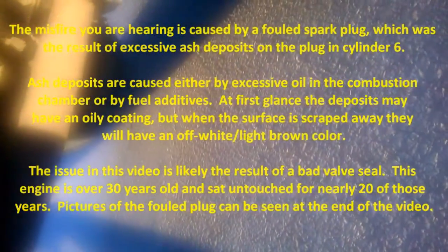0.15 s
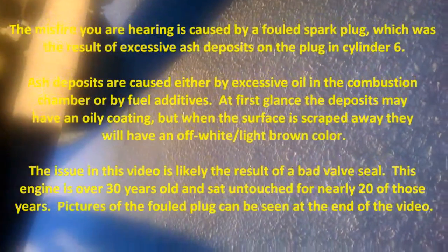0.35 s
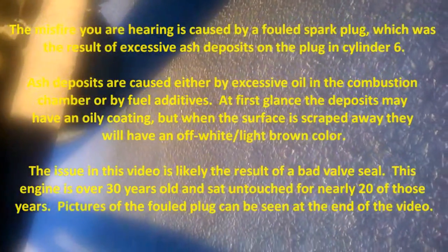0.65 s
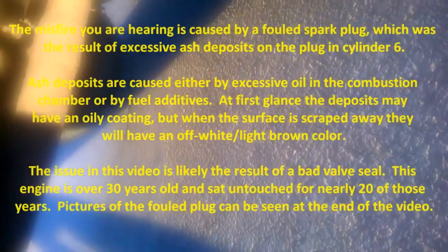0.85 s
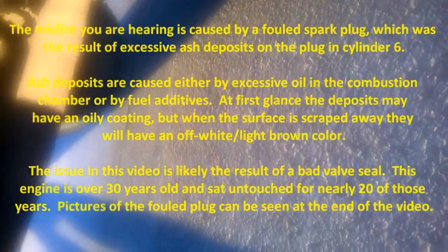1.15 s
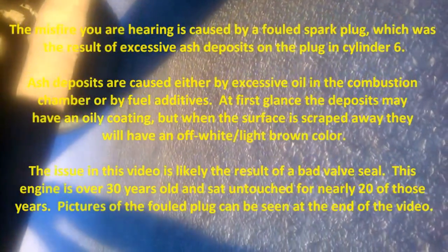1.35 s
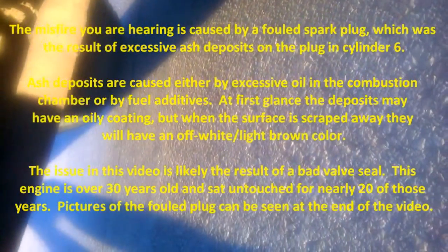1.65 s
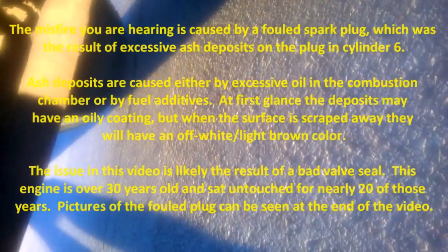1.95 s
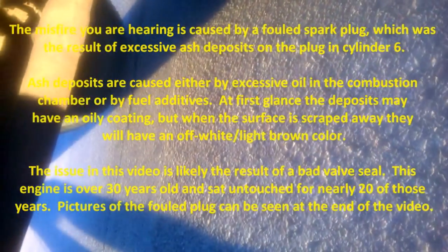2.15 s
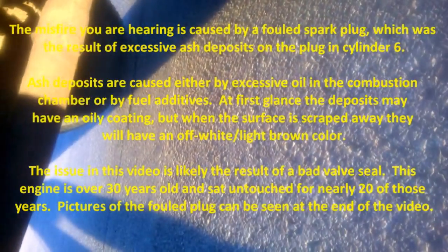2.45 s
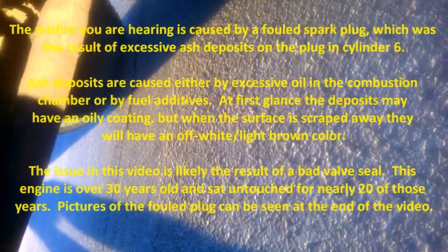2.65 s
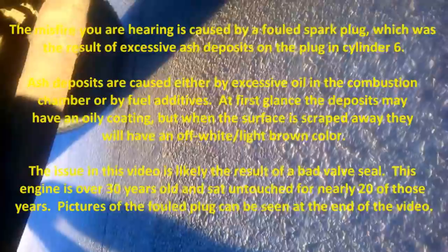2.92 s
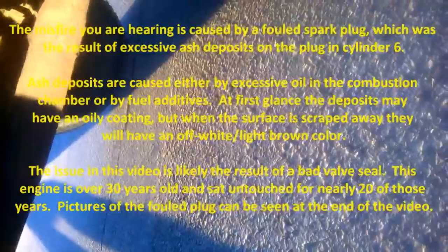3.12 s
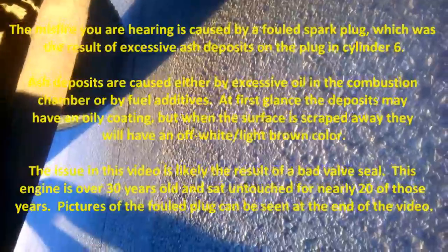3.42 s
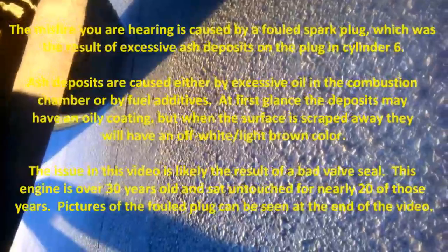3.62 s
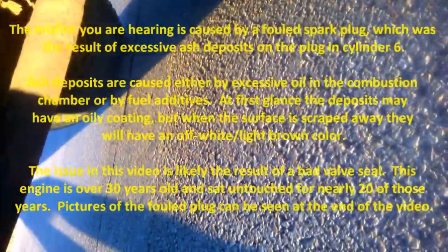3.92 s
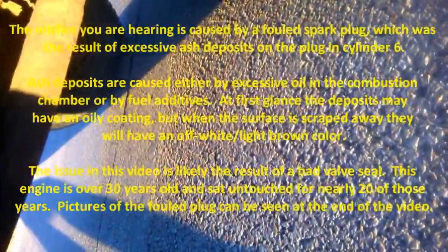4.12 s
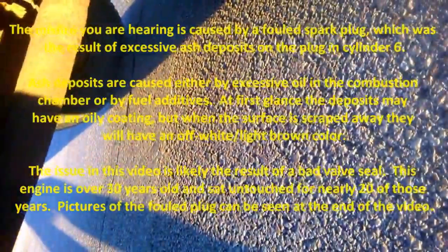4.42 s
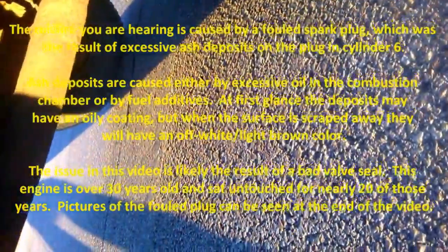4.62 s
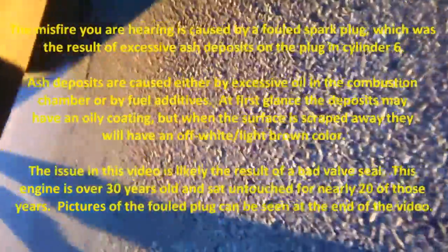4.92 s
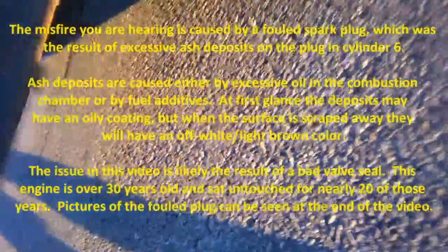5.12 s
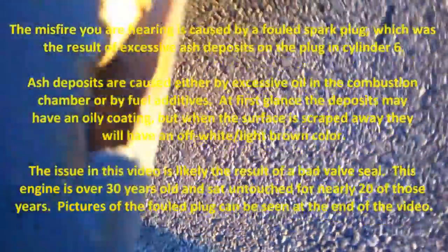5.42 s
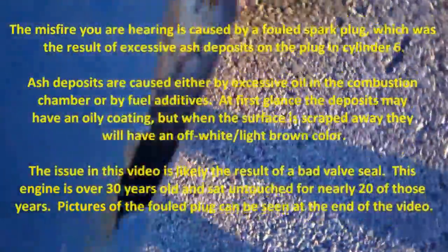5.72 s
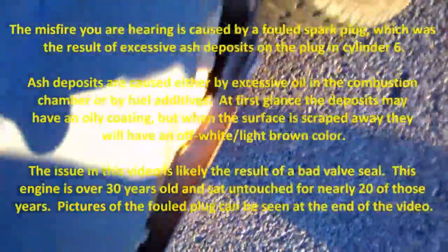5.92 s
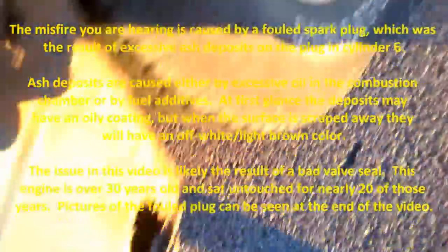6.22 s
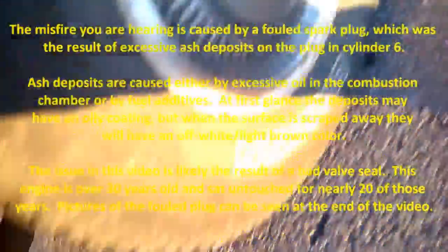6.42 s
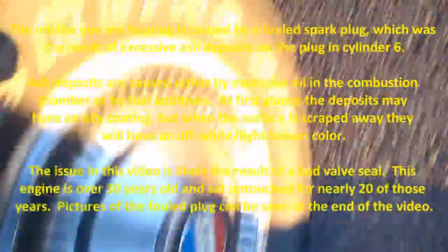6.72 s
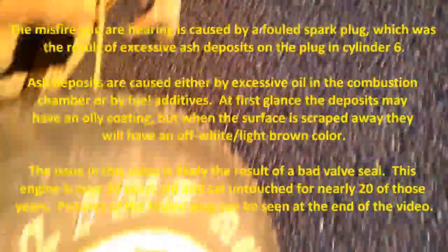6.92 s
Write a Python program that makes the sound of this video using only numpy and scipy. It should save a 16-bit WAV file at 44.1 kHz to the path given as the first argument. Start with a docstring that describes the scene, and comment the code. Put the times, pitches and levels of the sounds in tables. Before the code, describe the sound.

A steady low engine drone dominates, recorded near the exhaust, with uneven flutter and faint clatter and fan rush behind. A misfire pops just after two seconds, with a small click as the sound skips, then again around three and five seconds; the idle dips and recovers each time. Finally the exhaust thins out and the ticking, rushing engine bay is left exposed.

```python
"""Idling six-cylinder engine near its tailpipe

The exhaust hums on harmonics of the four-stroke cycle, while random firing strengths ring the pipe modes.
The engine bay adds shaped-noise roar, valve ticks as short damped tones, belt whine and a block drone.
Three misfired charges pop in the exhaust as a pipe ring and bursts of noise, and the idle sags.
Late on the microphone moves from the pipe towards the bay; once the sound skips ahead with a click."""
import sys
import numpy as np
from scipy import signal
from scipy.fft import rfft, irfft
from scipy.io import wavfile

SR = 44100
rng = np.random.default_rng(int(sys.argv[2]) if len(sys.argv) > 2 else 0)


def generate_wav(signal):
    """Clip the signal to [-1, 1] and save it as 16-bit WAV at the path in sys.argv[1]."""
    frames = np.transpose(np.atleast_2d(signal))
    scaled = np.clip(frames, -1, 1) * 32767
    pcm = np.round(scaled).astype(np.int16)
    wavfile.write(sys.argv[1], SR, pcm)


N = 311346


def gain_of(db):
    """Logarithmic level: decibels to amplitude ratio."""
    return 10 ** (np.asarray(db) / 20)


def evened(x):
    """Power normalisation: scales to rms 1."""
    return x / np.sqrt(np.mean(x ** 2) + 1e-20)


def read(points, hz):
    """Spectral envelope: interpolates levels along a log-frequency axis."""
    f, value = np.transpose(points)
    return np.interp(np.log(hz + 1), np.log(f + 1), value)


def curve(table, column):
    """Piecewise-linear control: reads one column of a time table at every sample."""
    columns = np.transpose(table)
    return np.interp(np.arange(N) / SR, columns[0], columns[column])


def resonate(x, hz, width):
    """Heterodyne resonance: shifts the frequency track hz to zero, smooths, and shifts back."""
    carrier = np.exp(2j * np.pi * np.cumsum(hz * np.ones(N)) / SR)
    decay = np.exp(-np.pi * width / SR)
    smoothed = signal.lfilter([1 - decay], [1, -decay], x / carrier)
    return 2 * (carrier * smoothed).real


def coloured(db_of):
    """Spectral shaping: white noise filtered to a level per Hz given by db_of, at rms 1."""
    hz = np.fft.rfftfreq(N, 1 / SR)
    spectrum = rfft(rng.standard_normal(N)) * gain_of(db_of(hz))
    return evened(irfft(spectrum, N))


def swell(age):
    """Critically damped envelope: rises from 0 to a peak of 1 at age 1, then dies away."""
    return age * np.exp(1 - age)


# the skip: moment in the sound [s], engine time passed over [s]
SKIP_AT_S, SKIP_S = 2.26512, .1454


def engine_clock():
    """Time discontinuity: engine time jumps ahead where the sound skips."""
    t = np.arange(N) / SR
    return t + SKIP_S * (t > SKIP_AT_S)


# idle speed as the governor hunts, before any misfire sag: start_s [s], speed_rpm [rpm]
IDLE_SPEED = [(0.0, 917.8), (0.403, 940.22), (1.324, 929.13), (1.812, 946.85), (2.124, 926.12),
              (2.245, 960.0), (2.426, 919.95), (2.728, 930.64), (3.635, 945.43), (3.973, 929.29),
              (4.302, 936.91), (4.881, 918.8), (5.01, 933.07), (5.868, 908.64), (6.354, 936.57),
              (7.06, 940.12)]
# sag after a lost firing: scale before the two exponentials [rpm], lead ahead of the pop [s]
SAG_SCALE_RPM, SAG_LEAD_S = 81.644, .0592
# time constants of slowing and of recovery [s]
SAG_FALL_S, SAG_RECOVER_S = .09613, .21918


def crank_rpm():
    """Rotational inertia: the hunting idle sags and recovers exponentially at each lost firing."""
    clock, rpm = engine_clock(), curve(IDLE_SPEED, 1)
    for start_s, *_ in MISFIRE_POPS:
        since = np.maximum(clock - clock[round(start_s * SR)] + SAG_LEAD_S, 0)
        slowing = 1 - np.exp(-since / SAG_FALL_S)
        rpm = rpm - SAG_SCALE_RPM * slowing * np.exp(-since / SAG_RECOVER_S)
    return rpm


def cycles():
    """Phase integration: four-stroke cycles done, one for two turns of the crank."""
    return np.cumsum(crank_rpm() * np.diff(engine_clock(), prepend=0)) / 120


# levels as the microphone moves: start_s [s], second_firing_order_db [dB],
# first_firing_order_db [dB], engine_bay_db [dB]
NEARNESS = [(0, -37, -37.5, -51), (.25, -34.5, -41.5, -51.2), (5.1, -34, -43.5, -51), (5.45, -39, -47, -53),
            (5.9, -39.5, -52, -53.5), (6.15, -40, -46, -52.5), (6.55, -44.5, -51, -52),
            (6.78, -51, -49, -51), (6.95, -67, -56, -50), (7.06, -62, -60, -49)]
# hum partials besides the first firing order: cycle_multiple [-], level_db [dB on the second-order level]
HUM_PARTIALS = [(8, -41), (9, -20), (12, -0.5), (14, -27), (16, -25), (18, -21.5), (20, -47), (24, -14),
                (26, -30), (30, -38), (36, -42.5), (48, -36)]
# weak firings, where these partials dip briefly: start_s (centre) [s], depth_db [dB]
WEAK_FIRINGS = [(1.06, -5), (2.79, -3.5), (2.99, -2), (3.637, -4.5), (3.815, -8.5), (4.93, -4), (5.475, -5)]


def exhaust_hum(turns):
    """Harmonic synthesis: phase-locked partials of the cycle, wavering with uneven burning."""
    angle = 2 * np.pi * (turns + .3238)
    # 0.7 dB rms of waver, most of it near 11 Hz
    waver = gain_of(.7 * coloured(lambda hz: -12 * np.log2((hz + .5) / 11) ** 2))
    t = np.arange(N) / SR
    dips_db = sum(db * np.exp(-((t - s) / 0.011) ** 2) for s, db in WEAK_FIRINGS)
    waver *= gain_of(dips_db)
    upper = sum(gain_of(db) * np.cos(k * angle + 2.3) for k, db in HUM_PARTIALS)
    first = np.cos(6 * angle + 2.55)
    return np.sqrt(2) * (gain_of(curve(NEARNESS, 1)) * waver * upper + gain_of(curve(NEARNESS, 2)) * first)


# exhaust pipe modes: pitch_hz [Hz], level_db [dB before puff smoothing], t60_s [s]
PIPE_MODES = [(55, -7, .13), (87.6, 0, .16), (178, 10.5, .19)]


def pipe_ring(puff_s=.0019):
    """Modal impulse response: decaying modes smoothed by a Gaussian puff of deviation puff_s."""
    t = np.arange(SR // 2) / SR
    modes = sum(gain_of(db - 60 * t / t60) * np.cos(2 * np.pi * hz * t + .13) for hz, db, t60 in PIPE_MODES)
    # the puff is centred 300 samples into the result
    puff = signal.windows.gaussian(601, puff_s * SR)
    return np.convolve(modes, puff / puff.sum())


# gas flow spectrum: frequency_hz [Hz], density_db [relative dB per Hz]
GAS_FLOW = [(15, -37.5), (30, -36.5), (50, 10), (75, 22.5), (92, -3.5), (125, 27.5), (150, 10), (175, 27.5),
            (195, 9.5), (215, -6.5), (300, -60)]


def uneven_burning(turns):
    """Random excitation: firings of varying strength kick the pipe modes over a gas-flow rumble."""
    firings = np.diff(np.floor(6 * turns + .1), prepend=0) > 0
    strengths = firings * rng.standard_normal(N)
    kicks = signal.oaconvolve(strengths, pipe_ring())[300:][:N]
    flow = coloured(lambda hz: read(GAS_FLOW, hz))
    # this layer follows the second firing order at 0.39 dB per dB
    level_db = -35.5 + 0.39 * np.maximum(curve(NEARNESS, 1), -53.7)
    return gain_of(level_db) * (evened(kicks) + flow)


# microphone turned to the bay: start_s [s], share [0-1]
FACING_BAY = [(0, 0.06), (5.1, 0), (5.5, 0.44), (6.2, 0.02), (6.6, 0.66), (7.06, 1)]
# roar away from the bay, before panels: frequency_hz [Hz], density_db [relative dB per Hz]
ROAR_AWAY = [(150, -20.5), (215, -0.5), (350, -7.5), (500, -8.5), (700, -8.5), (790, -13.5), (1250, -10),
             (2000, -10), (2850, -13), (3050, -20), (4300, -23), (4900, -28.5), (5550, -39), (6300, -51),
             (7500, -59)]
# panels that colour that roar: pitch_hz [Hz], width_hz [Hz], level_db [dB]
ROAR_PANELS = [(615, 80, 4), (883, 260, 5), (1410, 81, 4), (2090, 37, -2), (1980, 110, 2),
               (2850, 240, -1.5), (384, 55, 4.5)]
# roar facing the bay: frequency_hz [Hz], density_db [relative dB per Hz]
ROAR_TOWARDS = [(150, -18), (330, -4.5), (540, -11), (620, -11), (760, -7.5), (1120, -14.5), (1830, -10.5),
                (2600, -15.5), (3200, -25.5), (3950, -22), (4900, -30), (5550, -41), (6500, -51.5),
                (8000, -56), (10500, -53), (12000, -74)]


def bay_roar(turns, facing):
    """Power crossfade: two fan and intake noise colours, modulated once a cycle."""
    def panel_colour(hz):
        panels_db = sum(db * np.exp(-((hz - f) / w) ** 2) for f, w, db in ROAR_PANELS)
        return read(ROAR_AWAY, hz) + panels_db
    away = np.sqrt(1 - facing) * coloured(panel_colour)
    towards = np.sqrt(facing) * coloured(lambda hz: read(ROAR_TOWARDS, hz))
    # slow random flutter of 0.5 dB rms
    flutter = gain_of(.5 * coloured(lambda hz: -20 * np.log10(1 + (hz / 12) ** 2)))
    # one cylinder breathes louder, so the roar swells once a cycle
    breathing = gain_of(0.56 * np.cos(2 * np.pi * (turns - .63)))
    return (away + towards) * flutter * breathing


# valve gear: cycle_place [0-1], pitch_hz [mean Hz], level_db [dB on the bay level, before variation]
VALVE_TICKS = [(0, 2742, -10.5), (.07, 1095, -9), (.12, 935, -8.5), (.16, 703, -7), (.24, 2070, -11),
               (.26, 1388, -8), (.26, 2356, -12.5), (.31, 910, -9), (.41, 658, -11), (.49, 2760, -7),
               (.52, 4170, -20), (.55, 1906, -8), (.58, 1473, -10), (.59, 1738, -6), (.62, 2070, -9),
               (.7, 907, -8), (.73, 1404, -8.5), (.73, 3450, -20), (.74, 2260, -10), (.91, 1446, -14),
               (.98, 2463, -8.5)]


def valve_ticks(turns, facing, cycle_hz, rise_s=0.0043):
    """Impact resonance: valves ring the block as they close, each a short damped tone once a cycle."""
    out = np.zeros(N)
    for place, hz, db in VALVE_TICKS:
        since = ((turns - place + .5) % 1 - .5) / cycle_hz
        # every tick draws its own strength, pitch and phase
        tick_number = np.floor(turns - place + 1.5).astype(int)
        strength, pitch, phase = rng.standard_normal((70, 3))[tick_number].T
        age = np.maximum(since / rise_s + 1, 0)
        tone = np.cos(2 * np.pi * hz * (1 + .008 * pitch) * since + np.pi * phase)
        # turning to the bay shades the highest rings and bares the middle ones
        turned_db = -6 * facing * (hz > 2200) + 2.5 * facing * (abs(hz - 1850) < 250)
        out += gain_of(db + 2.0 * strength + turned_db) * swell(age) * np.sqrt(2) * tone
    return out


# belt-driven parts: cycle_multiple [-], width_hz [Hz, each of two passes],
# level_db [dB on the bay level, before turning]
BELT_WHINES = [(16.7, 8, -6), (33.2, 10, -16), (40.1, 10, -16), (58.2, 10, -13), (84.5, 14, -17),
               (120.4, 14, -18)]


def belt_whine(facing, cycle_hz):
    """Narrow-band filtering: noise through two resonances tracking each belt-driven part's speed."""
    out = np.zeros(N)
    for k, width, db in BELT_WHINES:
        once = resonate(rng.standard_normal(N), k * cycle_hz, width)
        whine = evened(resonate(once, k * cycle_hz, width))
        # turning to the bay weakens the higher whines
        out += gain_of(db - 9.3 * facing * (k > 20)) * whine
    return out


def block_drone(turns):
    """Order excitation: the block drones on the eleventh order of the crank."""
    return gain_of(-1.5) * np.cos(2 * np.pi * 22 * (turns + .3238) + 2.3)


def engine_bay(turns):
    """Superposition: roar, ticks, whines and drone share one level."""
    facing = np.clip(curve(FACING_BAY, 1), 0, 1)
    cycle_hz = crank_rpm() / 120
    out = bay_roar(turns, facing) + valve_ticks(turns, facing, cycle_hz)
    out += belt_whine(facing, cycle_hz) + block_drone(turns)
    return gain_of(curve(NEARNESS, 3)) * out


# misfire pops: start_s [s], blow_db [dB on the pipe ring], puff_ms [ms, Gaussian deviation],
# gas_db [dB, reference for the three gas noises]
MISFIRE_POPS = [(2.2491, -14, 2.05, -58), (3.1415, -16, 1.9, -56), (4.9531, -15.5, 1.9, -57)]


def misfires():
    """Transient excitation: unburnt charge lights, the pipe rings, gas spits and rushes, then fizzes."""
    clock, out = engine_clock(), np.zeros(N)
    # spit peaks at 4900 Hz; rush is the roar tilted up 5 dB an octave; fizz peaks at 8500 Hz
    spit = coloured(lambda hz: -10 * abs(np.log2((hz + 1) / 4900)) - 30 * np.clip((hz - 5300) / 1000, 0, 2))
    rush = coloured(lambda hz: read(ROAR_AWAY, hz) + 5 * np.log2(hz + 1) - 25 * (hz > 7500))
    fizz = coloured(lambda hz: -30 * np.log2((hz + 1) / 8500) ** 2 - 30 * (hz > 11300))
    for start_s, blow_db, puff_ms, gas_db in MISFIRE_POPS:
        ring = pipe_ring(puff_ms / 1000)
        since = clock - clock[round(start_s * SR)]
        out += gain_of(blow_db) * np.interp(since * SR + 300, np.arange(len(ring)), ring, 0, 0)
        quick = np.maximum(since + .0055, 0) / .0025
        slow = np.maximum(since + .002, 0) / .009
        out += gain_of(gas_db - 2.0) * swell(quick) * spit
        out += gain_of(gas_db + 4.5) * swell(slow) * rush
        out += gain_of(gas_db - 29) * np.exp(-((since - .035) / .025) ** 2) * fizz
    return out


def scene():
    """Synchronous sources: exhaust and engine bay share one crank."""
    turns = cycles()
    exhaust = exhaust_hum(turns) + uneven_burning(turns) + misfires()
    return (exhaust + engine_bay(turns))[None]


# microphone hiss spectrum: frequency_hz [Hz], density_db [relative dB per Hz]
MIC_HISS = [(3000, 3), (8000, 5), (10000, -3.5), (15500, -7)]
HISS_DB, EDGE_HZ = -91, 15700  # hiss rms level before the low-pass [dB], low-pass edge [Hz]


def record(dry):
    """Band limitation: faint microphone hiss joins the sound before a linear-phase low-pass."""
    hissing = dry + gain_of(HISS_DB) * coloured(lambda hz: read(MIC_HISS, hz))
    low_pass = signal.firwin(511, EDGE_HZ, window=("kaiser", 9), fs=SR)
    return signal.oaconvolve(hissing, low_pass[None], "same")


dry = scene()
out = record(dry)
generate_wav(out)
```